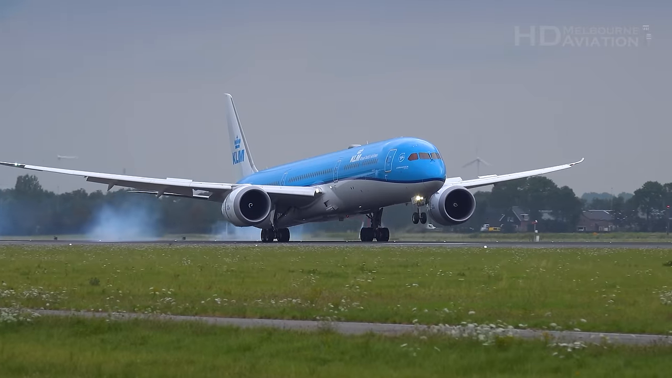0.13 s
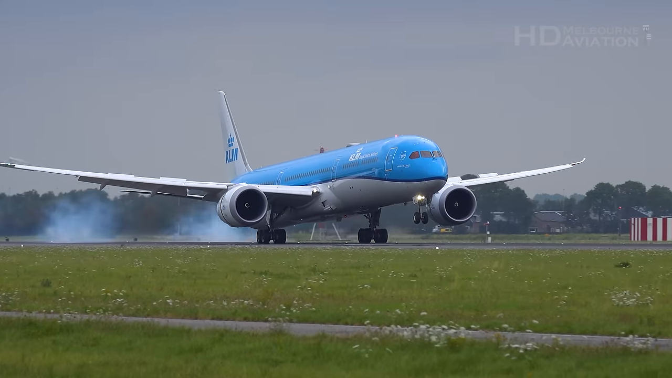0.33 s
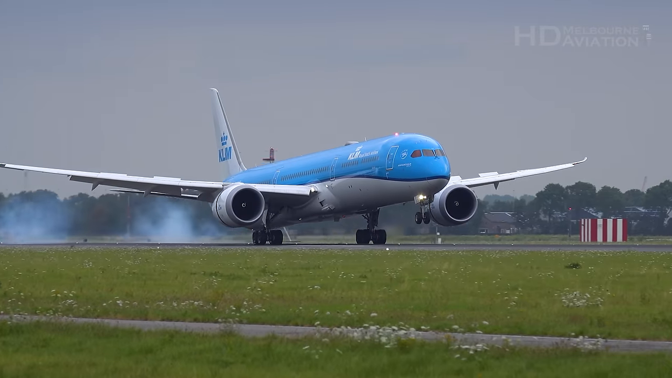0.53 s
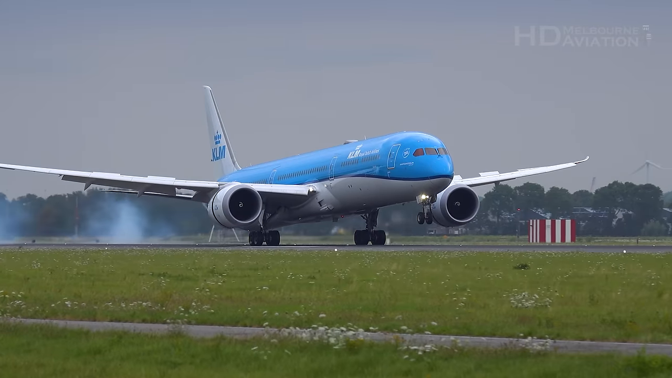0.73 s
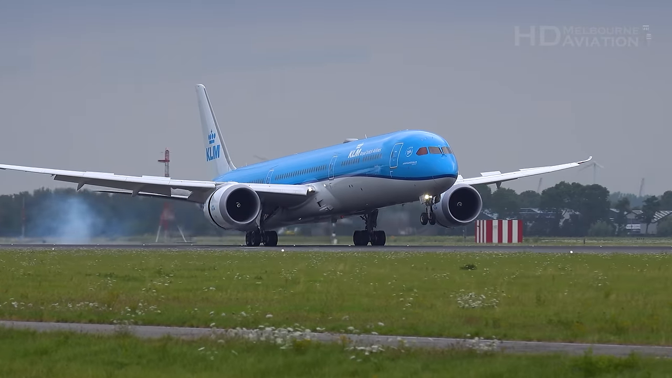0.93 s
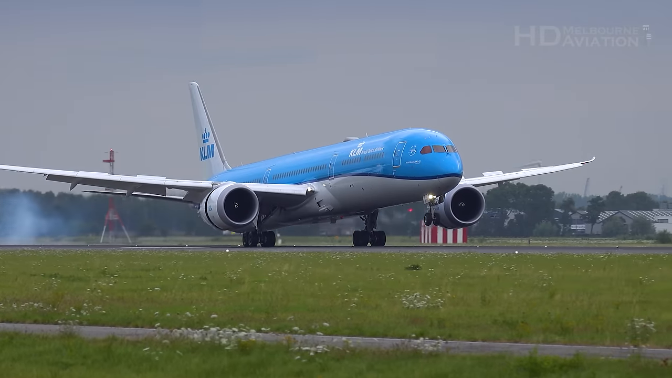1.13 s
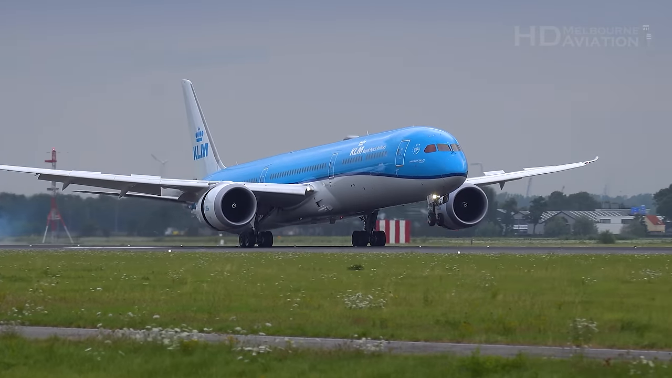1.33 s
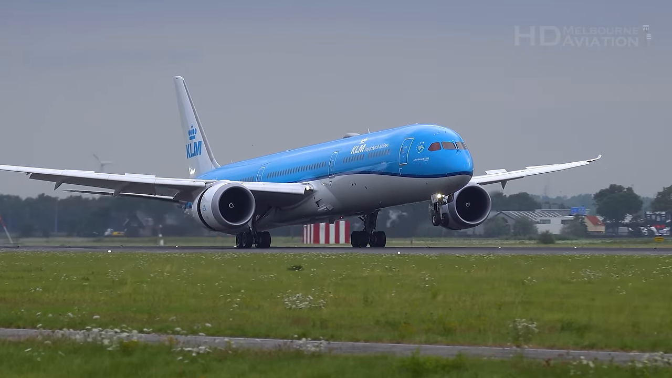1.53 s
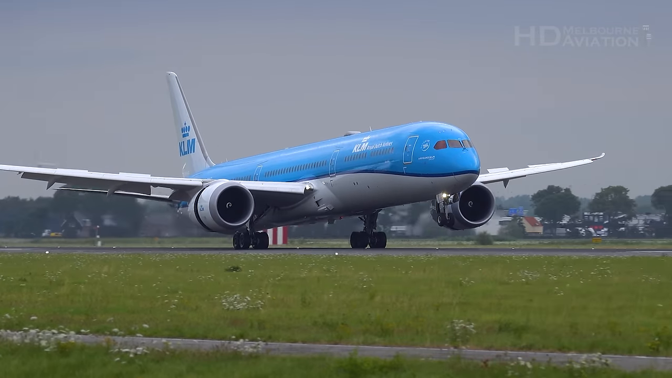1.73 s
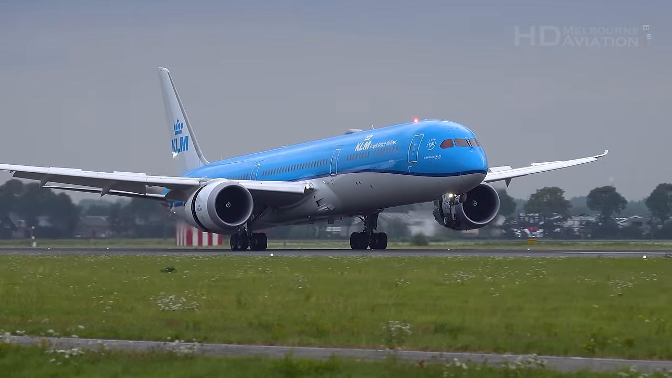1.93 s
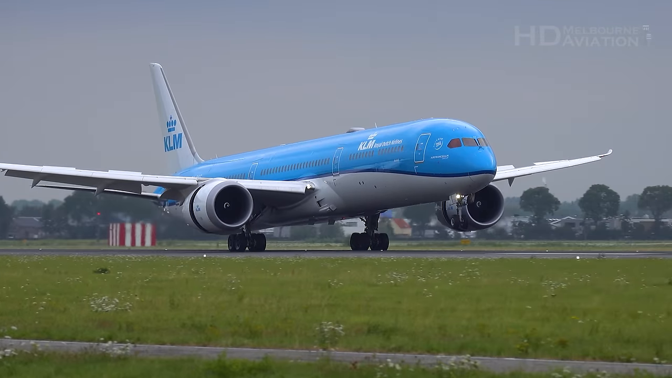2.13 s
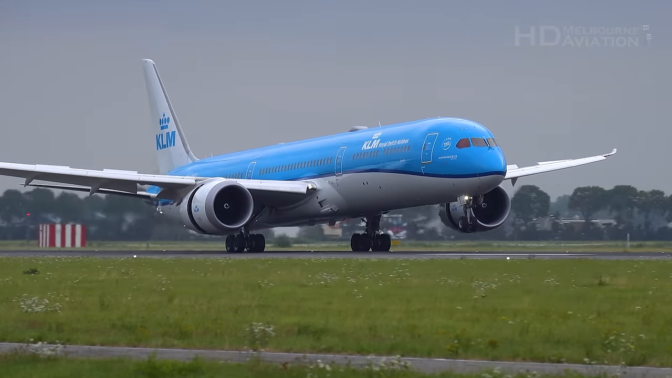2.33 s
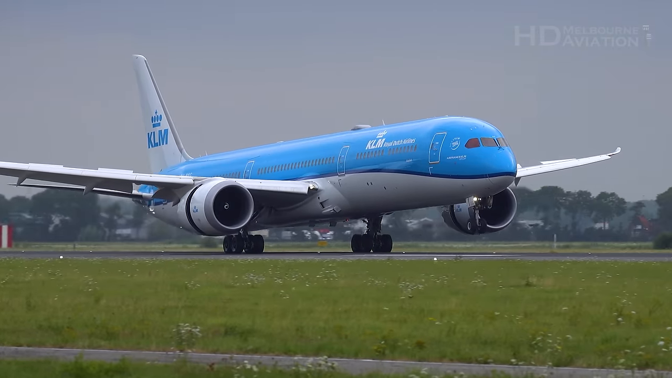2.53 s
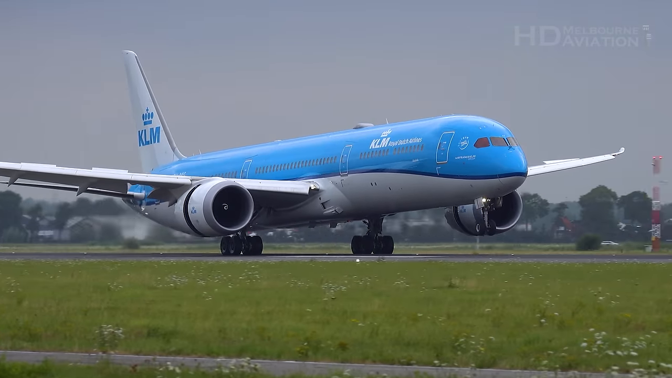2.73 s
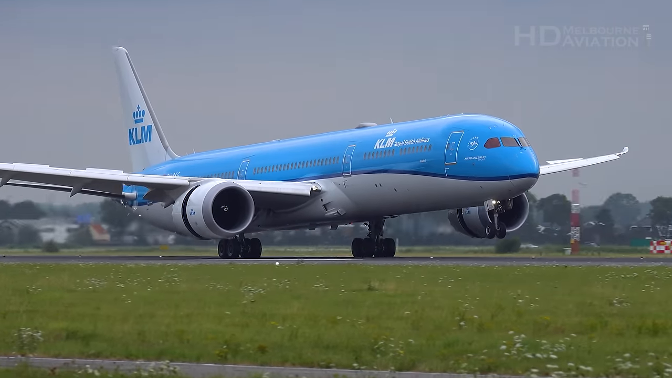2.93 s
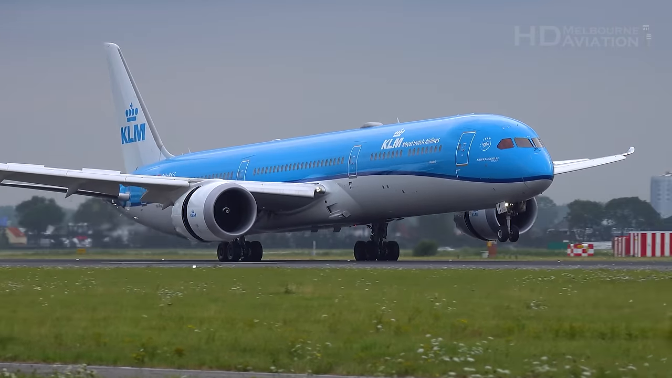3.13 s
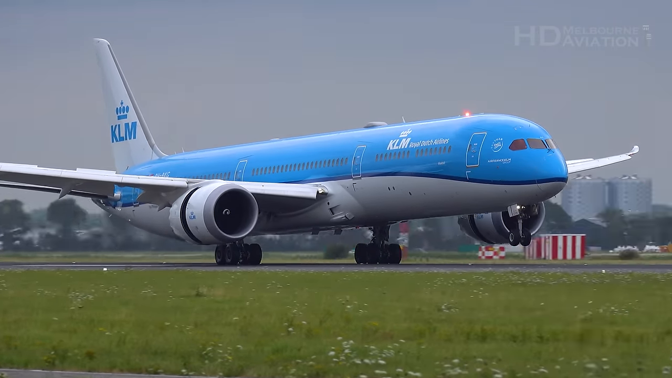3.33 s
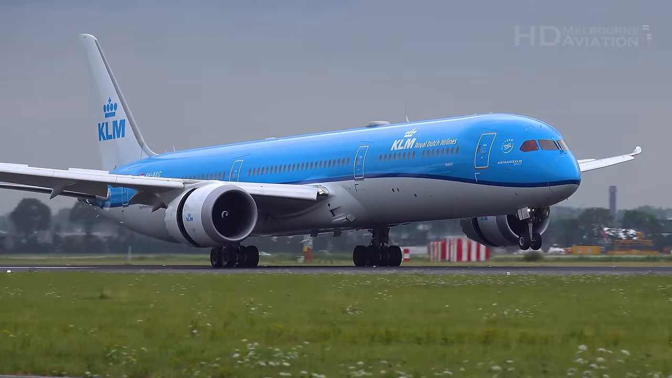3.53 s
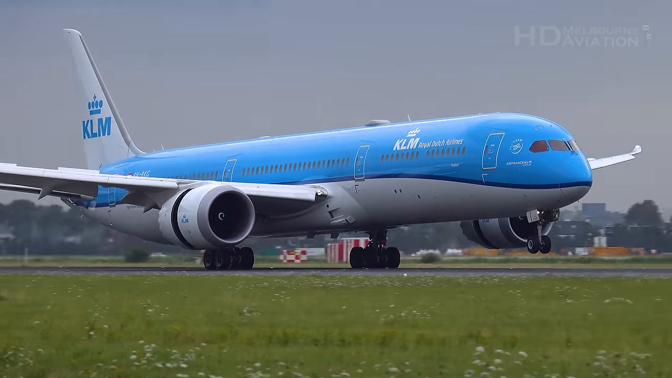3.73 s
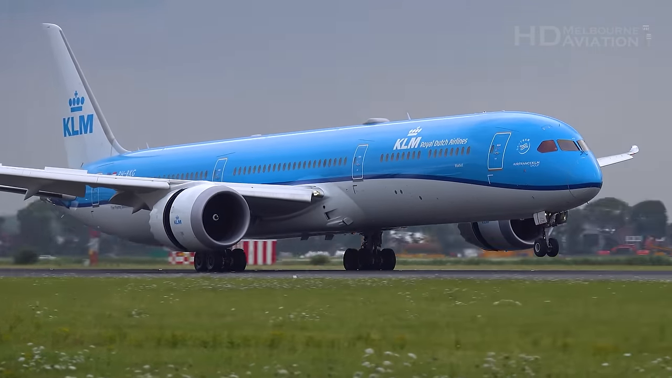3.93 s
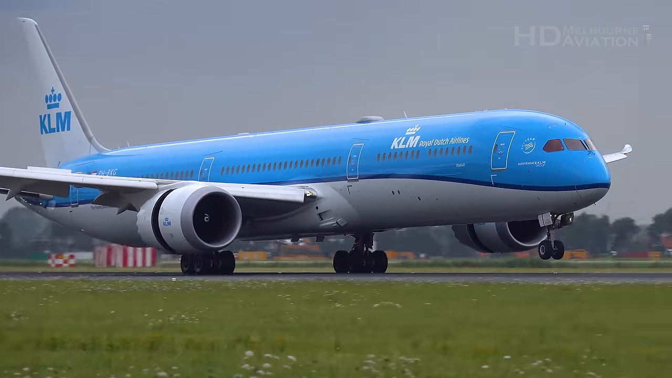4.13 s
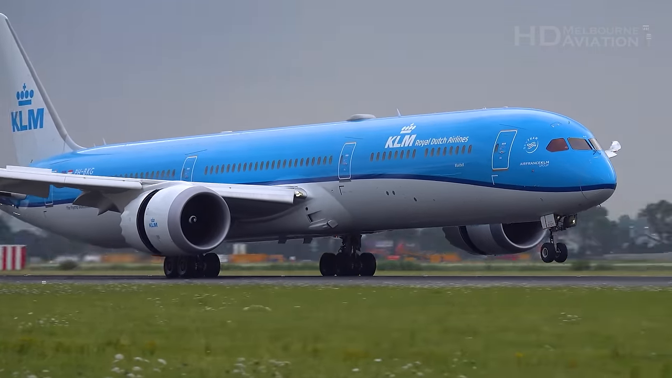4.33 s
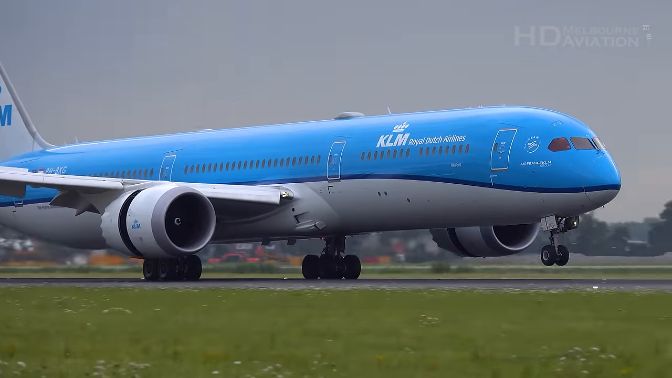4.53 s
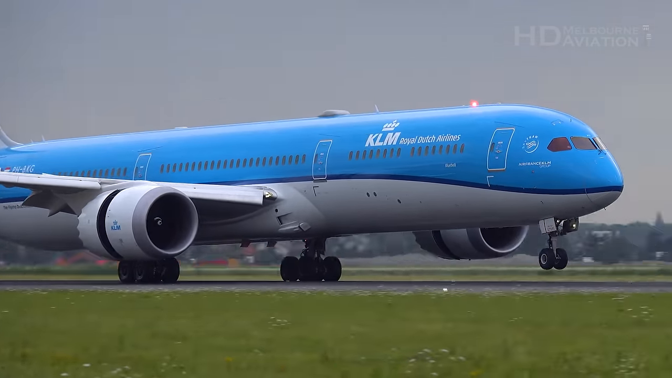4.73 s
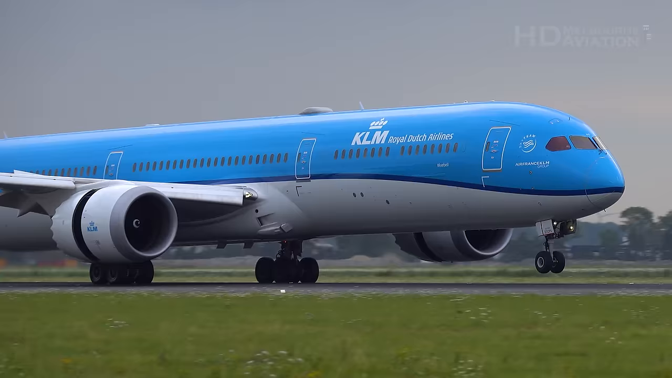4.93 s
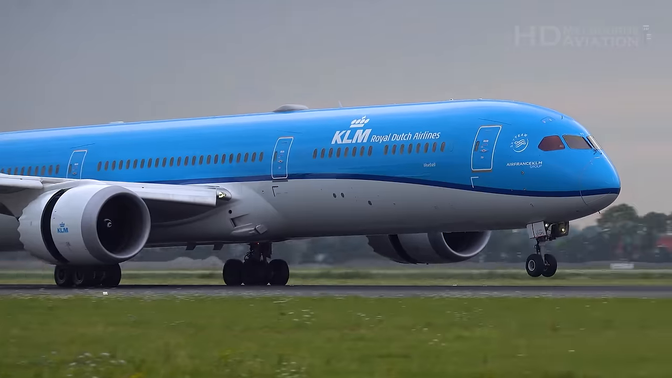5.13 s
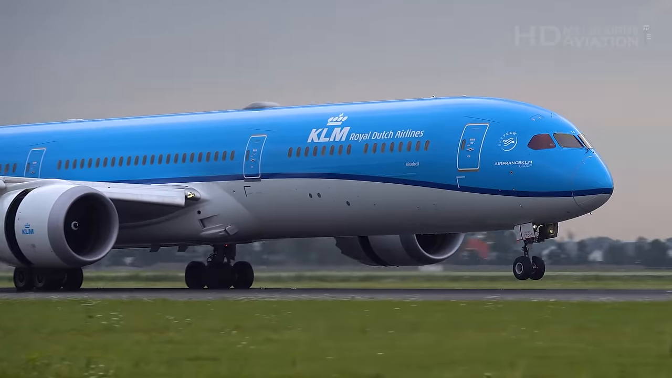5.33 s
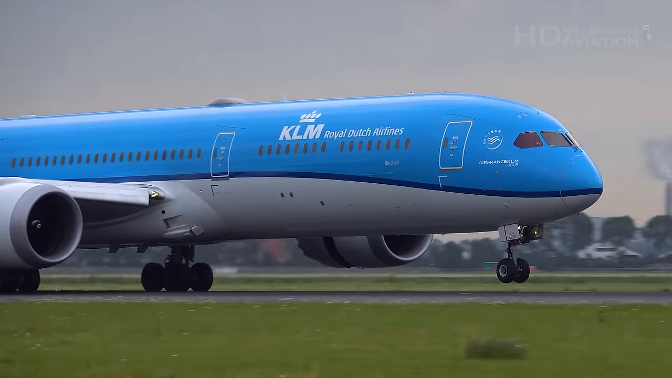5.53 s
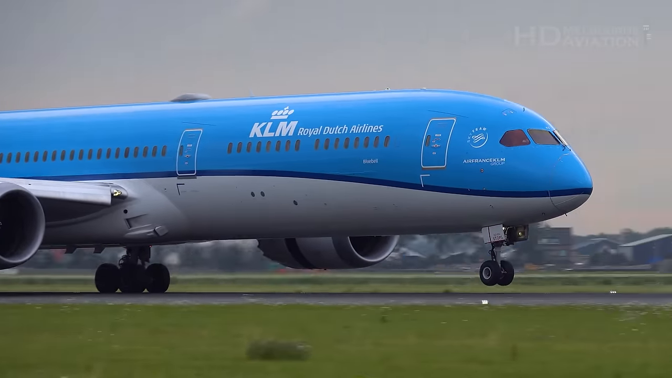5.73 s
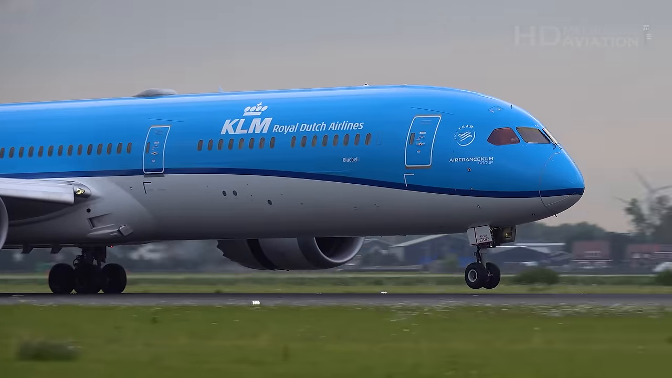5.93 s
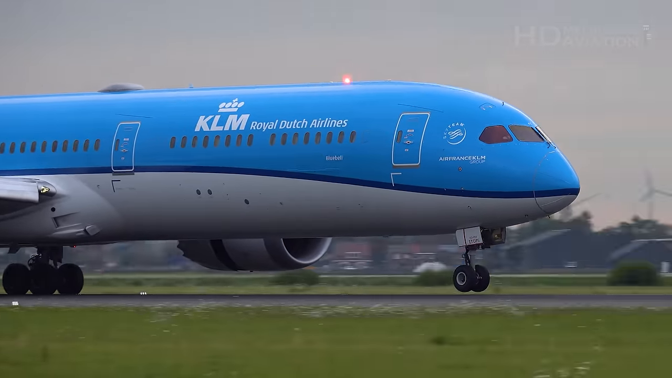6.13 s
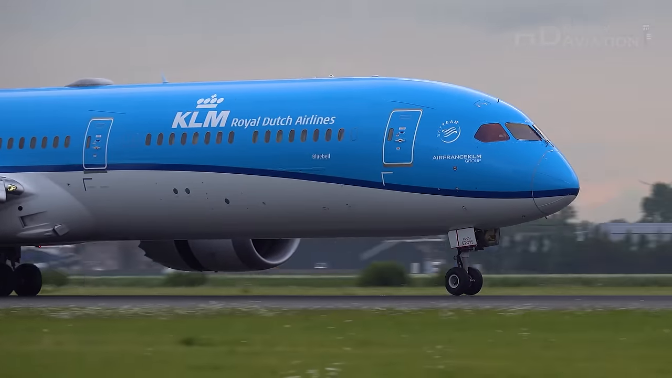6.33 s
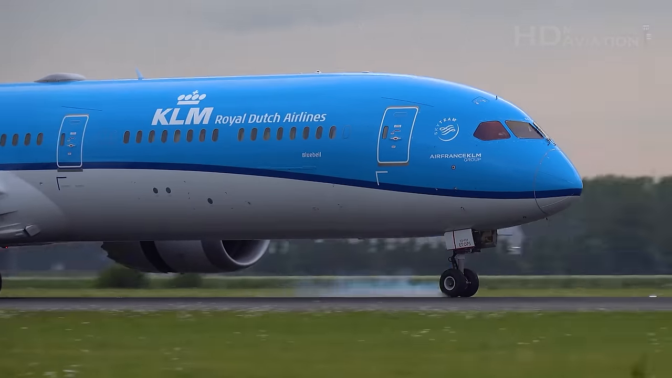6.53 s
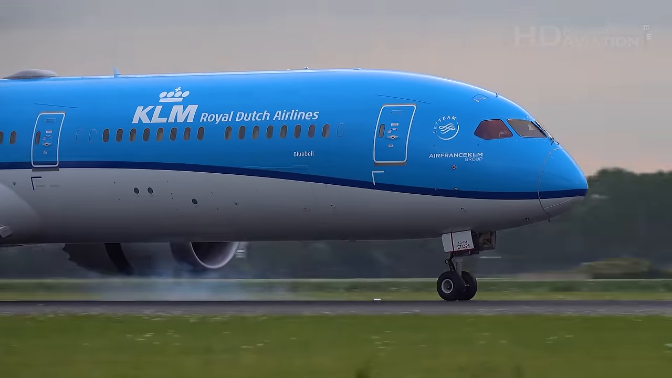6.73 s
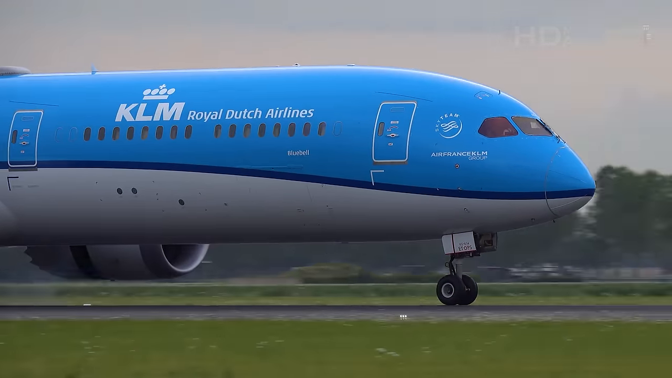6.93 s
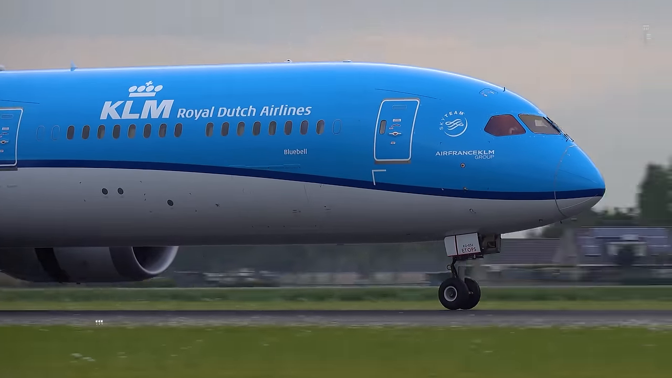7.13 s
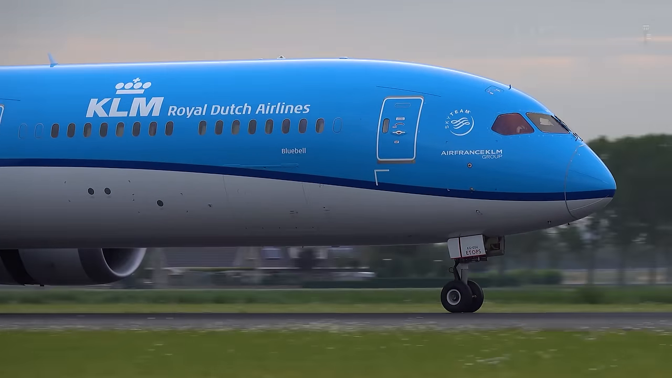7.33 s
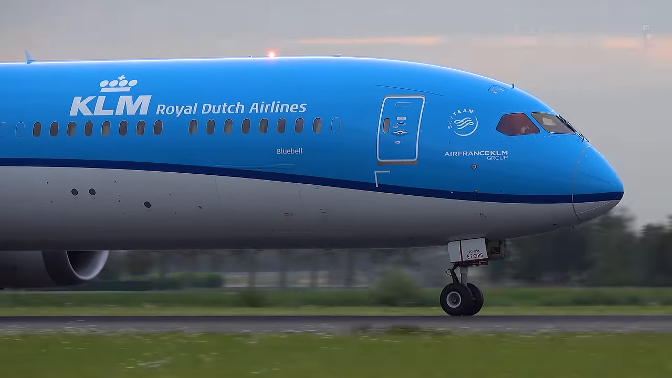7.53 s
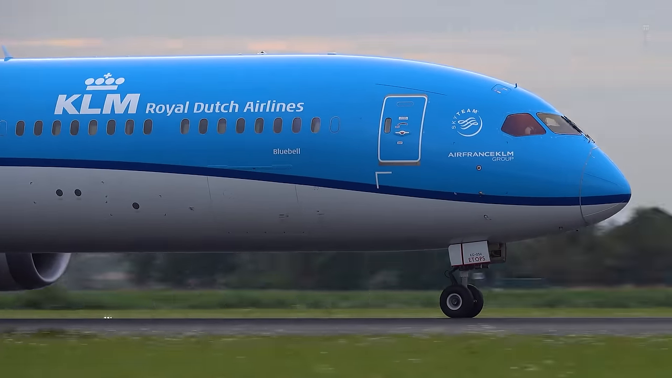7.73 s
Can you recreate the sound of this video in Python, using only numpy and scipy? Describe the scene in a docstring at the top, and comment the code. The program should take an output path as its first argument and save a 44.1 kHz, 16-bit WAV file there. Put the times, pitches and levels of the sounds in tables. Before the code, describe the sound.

Open airfield, single-channel microphone in the grass. A low distant engine drone opens quietly, with one tiny falling bird whistle almost at once. A landed jet airliner approaches along the runway; its reversed exhaust begins rumbling around one second, deepens in uneven surges after two and a half, and becomes a powerful roar. Broad airy rush brightens steadily, loudest at the end.

```python
"""A low airfield drone lies under a quiet start, where a small bird gives one thin falling whistle.
A large jet rolls out along the runway after touchdown, coming ever closer to a microphone in the grass.
Its reversed exhaust rumbles in surges: shaped noise read faster as the thrust rises. Fans and airframe rush:
broad noise, brighter as less air lies between. Narrow engine tones and some wider bands of rushing noise,
all filtered from noise, each swell and fade."""
import sys
import numpy as np
from scipy import signal
from scipy.fft import rfft, irfft
from scipy.io import wavfile
from scipy.ndimage import uniform_filter1d, map_coordinates

SR = 44100
rng = np.random.default_rng(int(sys.argv[2]) if len(sys.argv) > 2 else 0)


def file_out(sig):
    """Save sig as 16-bit WAV at sys.argv[1]."""
    # one column per channel
    cols = np.atleast_2d(sig).T
    # limit, then scale
    lim = np.clip(cols, -1, 1)
    pcm = np.round(lim * 32767).astype(np.int16)
    wavfile.write(sys.argv[1], SR, pcm)


N = 343539
TIME = np.arange(N) / SR
# the roll-out: speed, when the aircraft would draw level, and how far off the runway lies
SPEED_M_S, ABEAM_S, RUNWAY_M = 64.1, 8.67, 91


def undb(db):
    """Decibels to gain."""
    return 10 ** (np.asarray(db) / 20)


def curves(table, t):
    """Each column of a table at the times t."""
    s, *columns = np.transpose(table)
    return [np.interp(t, s, column) for column in columns]


def colour(points, hz):
    """A spectrum's dB at the given frequencies, read along a logarithmic frequency scale."""
    point_hz, db = np.transpose(points)
    return np.interp(np.log(np.maximum(hz, 1)), np.log(point_hz), db)


def noise(shape):
    """Noise of rms 1 whose gain follows shape(Hz)."""
    hz = np.arange(N // 2 + 1) * SR / N
    shaped = irfft(rfft(rng.standard_normal(N)) * shape(hz), N)
    return shaped / shaped.std()


def walk(rate_hz):
    """Slow chance of spread 1, up to about rate_hz changes a second."""
    return noise(lambda f: np.exp(-.5 * (f / rate_hz) ** 2))


def steady(flow, seconds):
    """Hold a flow's strength even over spans longer than the given time."""
    span = max(int(seconds * SR), 2)
    power = uniform_filter1d(uniform_filter1d(flow * flow, span), span)
    return flow / np.sqrt(power + 1e-12)


def distance(t):
    """Metres from the microphone to the aircraft on its straight runway."""
    return np.hypot(RUNWAY_M, SPEED_M_S * (ABEAM_S - t))


def airfield(drone_db=-44.0, swell_db=0.5, growth_db=1.5):
    """Far engines drone low, wavering a little and growing over the first 2.4 seconds."""
    # Spectrum of the distant drone. Each row: frequency in Hz, relative level in dB per Hz.
    drone_spectrum = [(10, -4), (32, 3.5), (60, -3), (120, -2.5), (190, 5.5), (265, -5.5), (350, -3),
                      (460, -25), (620, -18.5), (750, -34), (2000, -61), (6000, -110)]
    drone = steady(noise(lambda f: undb(colour(drone_spectrum, f))), seconds=0.35)
    growth = np.minimum(TIME / 2.4, 1) - .5
    return drone * undb(drone_db + swell_db * walk(1.9) + growth_db * growth)


def bird(start_s=.298, length_s=.102, start_hz=6900, end_hz=4150, level_db=-76, waver=.006):
    """One thin whistle sliding down in pitch, swelling and dying away, with a fast slight waver."""
    along = np.clip((TIME - start_s) / length_s, 0, 1)
    hz = start_hz * (end_hz / start_hz) ** along
    phase = 2 * np.pi * np.cumsum(hz * (1 + waver * walk(150))) / SR
    return np.sqrt(2) * np.sin(phase) * undb(level_db) * np.sin(np.pi * along)


def tones_and_bands():
    """Narrow engine tones, and some wider bands of rushing noise, each swelling and fading."""
    # Each row: centre in Hz, width in Hz, loudest moment in seconds,
    # spread of its swell and fade in seconds, level at the loudest in dB.
    noise_bands = [(372.6, 46, 2.4, 1.7, -54.5), (379, 55, 5.4, 0.76, -50), (622, 55, .3, 1.5, -66.5),
                   (1316, 98, 1.7, 1, -66.5), (1560, 40, 0.98, 0.4, -67), (3670, 80, 1.8, 0.55, -73),
                   (3410, 60, 2.7, .4, -74), (3080, 220, 2, 0.98, -73), (3125, 300, 4.7, .6, -58),
                   (1678, 52, 6.5, 1.1, -55.5), (3800, 250, 6.4, 0.67, -53), (326.16, 70, 7.4, 0.31, -43.5),
                   (1440, 640, 7.6, 0.35, -42)]
    out = 0
    for hz, width, when, lasting, db in noise_bands:
        band = noise(lambda f: 1 / (1 + (2 * (f - hz) / width) ** 4))
        swell = np.exp(-.5 * ((TIME - when) / lasting) ** 2)
        out = out + band * undb(db) * swell
    return out


def rush(pivot_hz=1400, air_hz=2450, dip_db=3.0, dip_width_hz=220, reference_hz=2820, climb=0.36,
         flicker_db=0.86):
    """Broad fan and airframe noise, dulled by the air and notched by its reflection off the ground."""
    # Rush heard at the microphone. Each row: time in seconds, level from 700 to 2200 Hz in dB.
    approach = [(0.05, -57.5), (2.52, -52.5), (2.76, -49.5), (2.9, -50.5), (3.76, -47.5), (4.37, -43),
                (5.59, -42.5), (6.21, -39.5), (7.1, -38.5), (7.7, -34)]
    # Spectrum of the rush ahead of dip and air. Each row: frequency in Hz, relative level in dB per Hz.
    rush_spectrum = [(120, -2.5), (330, 1), (520, -0.3), (680, -1.5), (810, -0.5), (940, -1.6), (1250, 1),
                     (1650, -0.56), (2100, -3), (3500, -3), (4200, -4.5), (4900, -13), (6000, -21.5),
                     (6950, -30), (8800, -39.5), (11000, -56), (16000, -99)]
    # treble tilt when abeam, and what each further metre takes, both as dB at pivot_hz + air_hz
    near_treble_db, air_db_per_m = 0.82, 0.0278
    frame = 4096  # samples
    bins_hz = np.maximum(np.arange(frame // 2 + 1) * SR / frame, 1)[:, None]
    _, t, grains = signal.stft(rng.standard_normal(N), SR, nperseg=frame)
    level_db, = curves(approach, t)

    # dip and hiss shift together as the angle changes
    notch_hz = np.interp(t, [0, 4.7, 6.2, 7.8], [2630, 2820, 2770, 3050])
    shape_db = colour(rush_spectrum, bins_hz / (notch_hz / reference_hz) ** climb)
    shape_db = shape_db - dip_db * np.exp(-.5 * ((bins_hz - notch_hz) / dip_width_hz) ** 2)

    # air absorption grows with frequency and shrinks smoothly as the aircraft nears
    treble_db = near_treble_db - air_db_per_m * (distance(t) - RUNWAY_M)
    tilt = (bins_hz - pivot_hz) / (air_hz + 0.24 * np.maximum(bins_hz - 4000, 0))
    shape_db = shape_db + treble_db * tilt

    # uneven air makes neighbouring frequencies swell and fade together
    flicker = uniform_filter1d(rng.standard_normal(grains.shape), size=12, axis=0)
    flicker = uniform_filter1d(flicker, size=7, axis=1)
    gain = undb(shape_db + flicker_db * flicker / flicker.std())

    # the level is set by the middle of the spectrum
    body = (bins_hz > 700) & (bins_hz < 2200)
    gain = gain / np.sqrt(np.mean(gain ** 2 * body, axis=0))
    return signal.istft(grains * gain * undb(level_db), SR, nperseg=frame)[1][:N]


def exhaust(split_hz=135, fine_db=0.94, buffet_db=1.3, buffet_rate_hz=8):
    """Big eddies of the reversed jets rumble in surges; small ones roar on more evenly."""
    # Reverse thrust. Each row: time in seconds, share from idle 0 to full 1.
    thrust_curve = [(.95, 0.034), (1.3, 0.29), (2.3, .2), (2.6, 0.54), (3.9, 0.79), (4.45, .98),
                    (5.4, 0.93), (7.5, .88)]
    # Spectrum of the eddies at pace 1. Each row: frequency in Hz, relative level in dB per Hz.
    rumble_spectrum = [(10, -33.5), (22, -22), (33, -9.5), (50, 0.5), (68, 0.5), (94, 0.5), (120, -5.5),
                       (160, -11), (215, -18), (270, -28), (420, -42), (900, -81), (3000, -130)]
    # The strongest surges. Each row: moment in seconds, half length in seconds, rise in dB.
    strong_surges = [(1.33, .07, 2.5), (2.146, 0.017, 9), (3.42, 0.11, 3), (5.67, 0.046, 4.5),
                     (6.22, 0.069, 3), (7.218, 0.064, 3.5), (7.716, 0.076, 7)]
    # level at full thrust when abeam, and idle relative to that
    full_db, idle_db = -10.5, -19.5
    # how fast the eddies pass, as a share of the rumble's own pace
    idle_pace, full_pace = .62, 1.03

    thrust, = curves(thrust_curve, TIME)
    level_db = full_db + idle_db * (1 - thrust) - 20 * np.log10(distance(TIME) / RUNWAY_M)
    pace = idle_pace + (full_pace - idle_pace) * thrust

    surge_db = buffet_db * walk(buffet_rate_hz)
    for when, half, rise in strong_surges:
        surge_db = surge_db + rise * np.exp(-.5 * ((TIME - when) / half) ** 2)

    eddies = noise(lambda f: undb(colour(rumble_spectrum, f)))
    # reading the noise faster raises its pitch
    eddies = map_coordinates(eddies, [np.cumsum(pace)], order=3, mode="mirror")
    big = signal.sosfiltfilt(signal.butter(4, split_hz, fs=SR, output="sos"), eddies)
    small = eddies - big
    surges = steady(big, seconds=.07) * big.std() * undb(level_db + surge_db)
    # the strongest eddies level off towards an amplitude of 0.64
    envelope = np.abs(signal.hilbert(surges))
    surges = surges / (1 + (envelope / .64) ** 6) ** (1 / 6)
    return surges + small * undb(level_db + fine_db)


def scene():
    """The aircraft over the airfield's own sounds, on one channel."""
    return (airfield() + bird() + tones_and_bands() + rush() + exhaust())[None]


def record(dry, hiss_db=-76.0, top_hz=15700):
    """The microphone adds a faint hiss; everything above top_hz is cut."""
    hiss = undb(hiss_db) * rng.standard_normal(dry.shape)
    low_pass = signal.ellip(10, .1, 80, top_hz, fs=SR, output="sos")
    return signal.sosfilt(low_pass, dry + hiss)


dry = scene()
out = record(dry)
file_out(out)
```